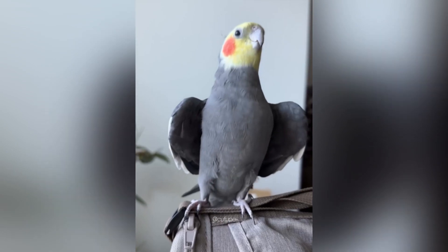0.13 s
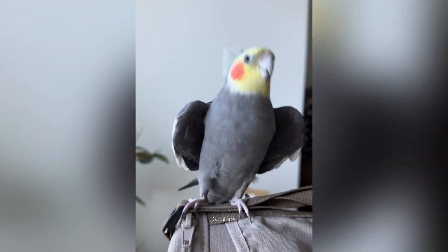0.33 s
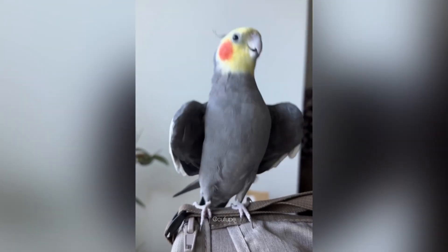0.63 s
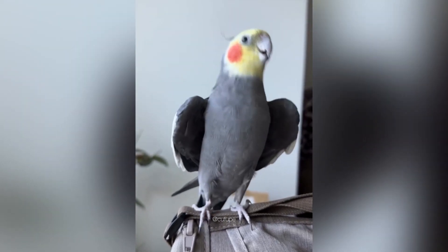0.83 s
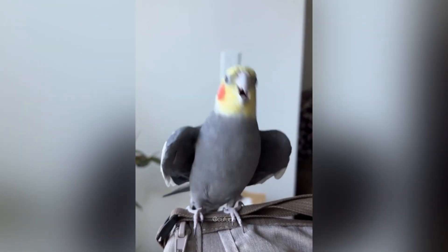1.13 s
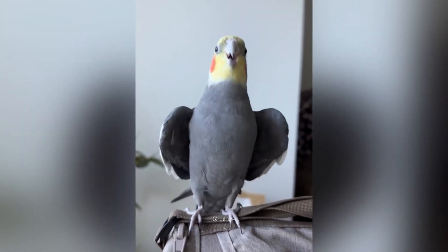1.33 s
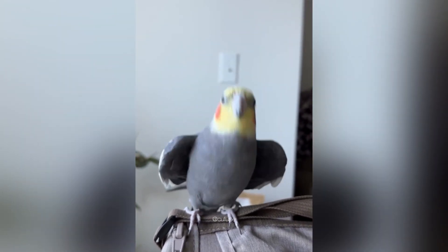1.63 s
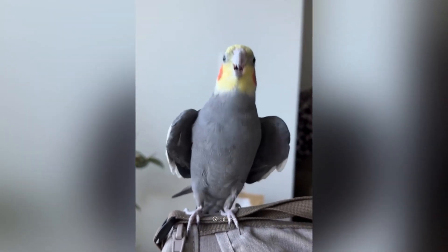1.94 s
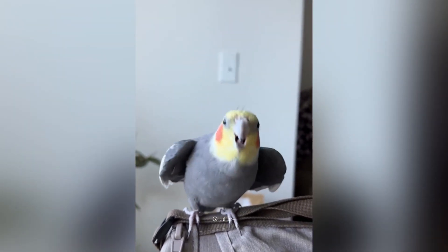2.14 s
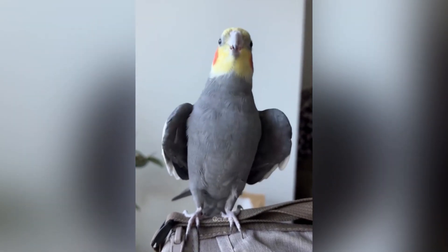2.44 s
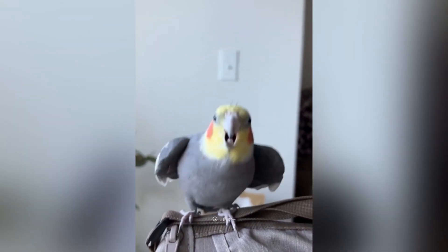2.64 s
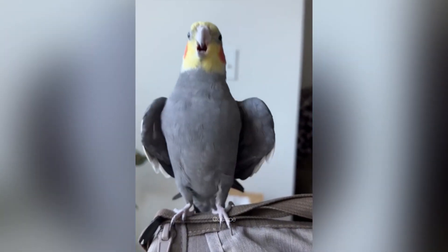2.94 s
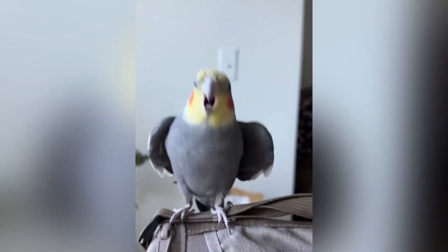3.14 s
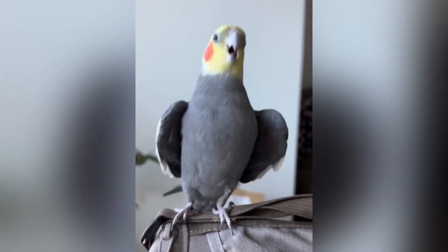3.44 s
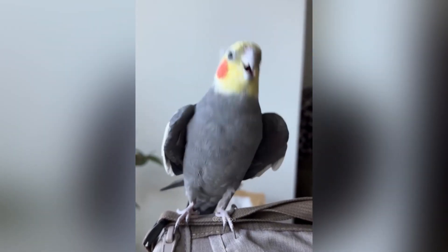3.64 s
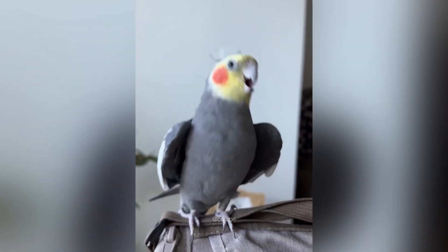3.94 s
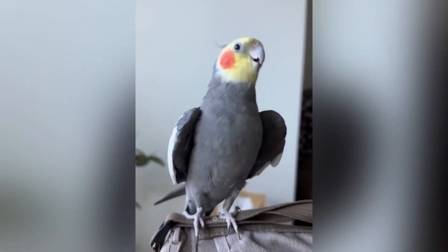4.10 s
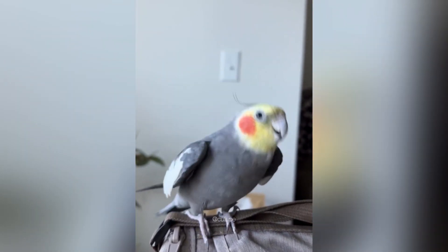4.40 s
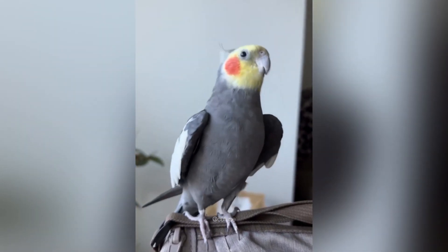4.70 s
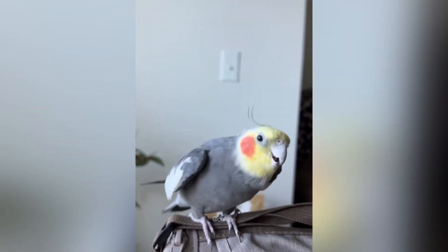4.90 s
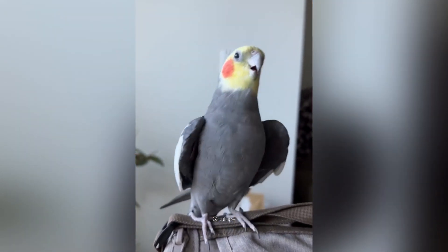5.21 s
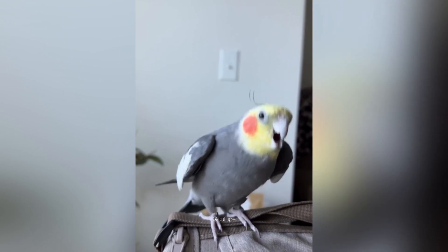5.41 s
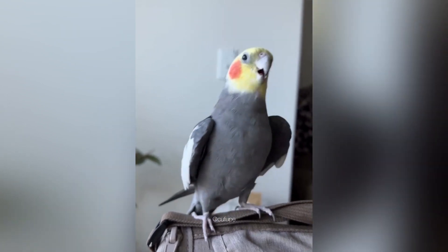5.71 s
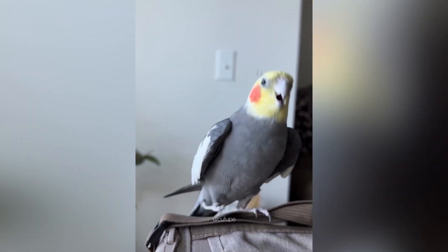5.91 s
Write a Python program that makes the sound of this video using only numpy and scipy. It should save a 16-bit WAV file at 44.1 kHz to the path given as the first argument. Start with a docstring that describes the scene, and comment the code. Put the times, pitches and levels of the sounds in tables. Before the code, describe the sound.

In a small room, a cockatiel shifts with a few faint claw ticks on cloth and a soft feather rustle. It then sings three runs of quick, high whistled chirps with short breaks between them. Each note starts with a creaky rasp, and the notes repeat in groups of three, the last one longer. The bird is close to the microphone, with slight room echo and a faint household motor hum behind.

```python
"""A pet parrot on a chair back sings three runs of short, creaky whistled notes in a small room.
A vibrating membrane gives each whistle its partials; where it slips, it stalls and clicks into a creak.
Throat and beak filter the sound, and near surfaces and the room reflect it.
Claws tick on the cloth and feathers rustle as the bird shifts before it starts.
Behind it a household motor hums and buzzes faintly over soft room noise."""
import sys
import numpy as np
from scipy import signal
from scipy.fft import rfft, irfft
from scipy.io import wavfile
from scipy.ndimage import uniform_filter1d

SR = 44100
rng = np.random.default_rng(int(sys.argv[2]) if len(sys.argv) > 2 else 0)


def dump(signal):
    """Clip the signal to [-1, 1] and save it as 16-bit WAV at the path in sys.argv[1]."""
    limited = np.clip(np.atleast_2d(signal).T, -1, 1)
    pcm = np.round(limited * 32767).astype(np.int16)
    wavfile.write(sys.argv[1], SR, pcm)


N = 267025

# Stereo balance. Each row: frequency in Hz, left minus right level in dB.
BALANCE = [(300, 0), (640, -2.5), (1410, -.5), (3100, 2.5), (6800, .5)]
def parrot():
    """Superposition: the direct song adds to early reflections and to the room's reverberation."""
    song, near = np.zeros((2, N))
    for voice in score():
        start, sound = note(*voice)
        add(song, start, sound)
        for delay, sign in rng.random((8, 2)):  # the head moves: new echoes, within 6 ms, for each note
            add(near, start + delay * .006, np.sign(sign - .5) * sound)
    add(song, *squeak())
    song, near = highpass([song, near], 380)
    balance_db = read(BALANCE, np.fft.rfftfreq(N, 1 / SR))
    direct = np.array([irfft(rfft(song) * amp(side * balance_db), N) for side in (.5, -.5)])
    sideways = near * [[1], [-1]]  # echoes from the side are opposite in the two channels
    return direct + amp(-20.5) * sideways + amp(-12) * room(song)


SLIPS_PER_S = 350
# Subharmonic spectrum. Each row: frequency in Hz, gain in dB.
SUBHARMONIC_GAIN = [(700, -10), (2100, -4), (3500, 3)]
def note(points, beak_hz, least_rasp):
    """Self-sustained oscillation: a membrane whistles; each slip stalls it and jolts its phase."""
    times, *columns = np.transpose(points)
    t = np.arange(times[0], times[-1], 1 / SR)
    age = t - times[0]
    hz, octave_db, fundamental_db, sub_db, creak_db, treble_db = (np.interp(t, times, c) for c in columns)
    rough = 1 / (1 + amp(1.42 * (np.maximum(octave_db, fundamental_db) - creak_db - 2)))  # creak share
    slip_count = np.cumsum(SLIPS_PER_S * amp(2 * drift(len(t), 90))) / SR
    slip = np.diff(np.floor(slip_count), prepend=0) > 0
    jolt, force, breath = rng.standard_normal((len(t), 3)).T
    turns = np.cumsum(hz * (1 + .0034 * drift(len(t), 150))) / SR
    turns += uniform_filter1d(np.cumsum(.22 * rough * slip * jolt), 24)
    swing = 1 - np.clip(1.22 * rough, 0, 1) * (1 - slip_count % 1) ** 2  # regrows after each slip
    swing = uniform_filter1d(swing, 16)
    shimmer = amp(.27 * drift(len(t), 260))
    low = amp(fundamental_db) * np.cos(2 * np.pi * turns)
    low += amp(octave_db) * shimmer * np.cos(4 * np.pi * turns + .71)
    for k in (1, 3, 5):
        low += amp(sub_db + read(SUBHARMONIC_GAIN, k * hz / 2)) * np.cos(np.pi * k * turns)
    alternation = amp(np.minimum(sub_db - fundamental_db - 4, 0))  # strong and weak cycles take turns
    beak = np.interp(age, [.02, .06], beak_hz)
    high = upper_partials(hz, turns, beak, alternation)
    dull, sharp = creak(age, slip_count, slip * amp(1.5 * force), breath, beak)
    rasp = np.clip(least_rasp + .68 * rough ** 1.77, 0, 1)
    treble = np.sqrt(2 * (1 - rasp)) * high * swing + np.sqrt(rasp) * sharp
    leak = evened(resonate(rng.standard_normal(len(t)), 8400, 3100))  # air hisses past the membrane
    hiss = amp(.65 * creak_db + .41 * treble_db - 16.5) * highpass(leak, 7200)
    release_s = .0023 + .023 * rough[-1] ** 2
    ramp = np.clip(np.minimum(age / .0025, (times[-1] - t) / release_s), 0, 1)
    sound = np.sqrt(2) * low * swing + amp(creak_db) * dull + amp(treble_db) * treble + hiss
    return times[0], np.sin(np.pi / 2 * ramp) ** 2 * sound


# Spectrum of the partials above the octave. Each row: frequency in Hz, gain in dB.
TREBLE_GAIN = [(3300, 10.5), (4200, -2.5), (5600, -1), (6300, -7.5), (7000, -14), (8400, -18), (10000, -24),
               (13000, -27.5), (14300, -42.5), (15500, -25.5)]
def upper_partials(hz, turns, beak_hz, alternation):
    """Source and filter: a spectral envelope and a beak resonance weight the multiples of half the pitch."""
    orders, sizes = range(6, 24), []
    for k in orders:
        formant = 1 + 2.67 / (1 + ((k * hz / 2 - beak_hz) / 400) ** 2)
        flicker_db = 3.9 * drift(len(hz), 400) * k / 12
        size = amp(read(TREBLE_GAIN, k * hz / 2) + flicker_db) * formant
        sizes.append(size * alternation if k % 2 else size)
    partials = sum(size * np.cos(np.pi * k * turns + .304 * k * k) for k, size in zip(orders, sizes))
    return partials / np.linalg.norm(sizes, axis=0)


SHUT_S, SPLIT_HZ = (.13, .27), 3700  # the beak shuts over this span after onset; dull/sharp crossover
# Creak spectra with the beak open and shut. Each row: frequency in Hz, gain in dB.
OPEN_CREAK = [(250, -30.5), (500, -11), (700, -5), (1100, -8), (1500, -3.5), (1900, -9), (2800, 12.5),
              (3500, -20), (4300, -6.5), (6000, -9.5), (7200, -31.5), (9000, -25), (13000, -65),
              (15500, -45)]
SHUT_CREAK = [(250, -33), (500, -4), (800, -1.5), (1100, -5), (1500, -9), (2100, 0), (2800, -4.5),
              (3500, -6.5), (4300, -2.5), (6000, -23), (7200, -21), (9000, -22), (13000, -29.5),
              (15500, -38)]
def creak(age, slip_count, clicks, breath, beak_hz):
    """Impulse excitation: slip clicks and breath ring the tract, giving a dull and a sharp band."""
    breathiness = np.interp(age, [.04, .12], [.4, 1.2])
    drive = evened(clicks) + breathiness * breath * (.1 + 2 * (slip_count % 1) ** 2)
    shut = np.interp(age, SHUT_S, [0, 1])
    early, late = (signal.oaconvolve(drive, causal(c))[:len(age)] for c in (OPEN_CREAK, SHUT_CREAK))
    sound = (1 - shut) * early + shut * late
    sound *= 1 + .35 / breathiness * np.cos(2 * np.pi * slip_count - .5)  # bursts around each slip
    dull = signal.sosfiltfilt(signal.butter(4, SPLIT_HZ, fs=SR, output="sos"), sound)
    sharp = sound - dull
    return evened(dull), evened(sharp + 2.6 * resonate(sharp, beak_hz, 320))


# Notes pass four stages: 0 onset, 1 crest of the creak, 2 clear whistle, 3 end of the whistle.
# Each row: onset in seconds; crest, clear and end in seconds after it; pitch at those three in Hz;
# octave level and its offset at the crest in dB; fundamental, subharmonic, creak and treble levels in dB;
# final swell in dB; creak, subharmonic and treble offsets when clear in dB; open beak resonance in Hz.
MIDDLE_NOTES = [ (0.861, 0.025, 0.054, 0.087, 1501, 1379, 1276, -27, 6.5, -40, -45, -40.5, -29.5, -4.5, -2, 1.5, -0.22, 5400),
                (1.128, 0.027, 0.055, 0.091, 1500, 1369, 1334, -27.5, -8, -41, -46, -40, -30.5, -4, 1.5, 2, 1, 4450),
                (1.687, 0.021, .054, 0.083, 1461, 1358, 1284, -28, -6.5, -42, -46, -40, -32, -2, 4.5, 1.5, 0.3, 4430),
                (2.267, 0.016, 0.055, 0.09, 1439, 1331, 1280, -29, -11, -42.5, -44.5, -38.5, -31.5, -4, -2, -2, -1.9, 4200),
                (3.073, 0.017, 0.039, 0.089, 1476, 1361, 1348, -23.5, 0, -39.5, -43, -44, -31, -0.5, -3, -7, 2.6, 5270),
                (3.353, 0.026, .052, 0.082, 1488, 1357, 1270, -29, -1, -42, -45.5, -43.5, -30, -2.5, 5, -3, -0.27, 4300),
                (3.935, 0.0268, 0.0537, .08, 1408, 1325, 1240, -28, 0.5, -42.5, -50, -42, -33.5, -4.5, -3, -2.5, -0.74, 4200),
                (4.776, 0.022, 0.062, 0.1, 1496, 1382, 1334, -25, 2, -38.5, -54, -44.5, -31.5, -3.5, 4.5, 2.5, 1.3, 5660),
                (5.057, .016, 0.049, 0.096, 1500, 1366, 1316, -28, -2, -42.5, -45.5, -44.5, -31.5, -5, 7, -2.5, 1, 4370),
                (5.606, 0.022, .046, 0.085, 1441, 1300, 1279, -29, -2, -44.5, -49.5, -39, -39, -1.5, -7, -15, 1, 4440)]
SHORT_NOTES = [ (1.002, 0.017, 0.05, 0.062, 1553, 1353, 1340, -25, -8, -39.5, -51, -37, -35.5, -2, -1.5, 6, 0.5, 4200),
               (1.28, 0.019, 0.045, .062, 1490, 1314, 1330, -27, -14, -42, -45, -40, -38.5, 1, 1, 0.5, -3.5, 4150),
               (1.836, 0.027, 0.047, 0.068, 1461, 1330, 1260, -28.5, -3, -42, -49.5, -40.5, -41.5, 1, -0.5, 3, 1.5, 4570),
               (2.422, 0.02, .044, 0.059, 1498, 1310, 1310, -27.5, -9.5, -42, -47, -40, -37.5, 5, -4, -2.5, -0.5, 4420),
               (3.219, 0.025, 0.052, .066, 1484, 1386, 1370, -23.5, -15, -39, -45, -38, -39, 2, 0, -1, 2, 5500),
               (3.503, 0.026, 0.047, 0.061, 1459, 1300, 1320, -28, -3.5, -42, -44.5, -39.5, -39, -2, -9, -8, -1.5, 4360),
               (4.082, 0.018, 0.044, .06, 1468, 1315, 1287, -28, -5.5, -43, -50.5, -40.5, -41, -9, -5, -2, 0.5, 4320),
               (4.932, 0.024, 0.04, 0.06, 1483, 1360, 1369, -27, -9, -42, -50, -40.5, -41.5, 7, 0.5, -8, 4.5, 5300),
               (5.217, 0.025, .042, 0.06, 1465, 1287, 1290, -27.5, -8, -44, -48, -39.5, -41, -1, -4, -1, -2, 3930),
               (5.761, 0.017, .046, 0.062, 1480, 1355, 1270, -27.5, -3, -43, -48.5, -41, -40.5, -3, 0, -4, -1, 4150)]
LONG_NOTES = [ (1.411, .022, 0.058, .11, 1528, 1397, 1406, -25.5, -4.5, -35, -44.5, -35.5, -30.5, 0.27, 1.5, 1.5, 1, 5500),
              (1.974, 0.024, 0.056, 0.12, 1513, 1394, 1394, -25, -4, -35, -45, -36, -31.5, 0.39, 1.5, 2, -0.5, 5490),
              (2.556, 0.025, 0.063, 0.12, 1483, 1411, 1389, -23.5, -1, -34, -40.5, -37, -29.5, 0, 0, 0.5, -1.5, 5510),
              (3.642, 0.022, 0.053, 0.12, 1506, 1411, 1395, -24.5, -1, -35.5, -48.5, -38.5, -31.5, 0.12, 2.5, 3.5, 1, 5370),
              (4.227, 0.0239, .052, .11, 1545, 1414, 1383, -27, 1, -36, -46, -38, -33, -0.37, -3, 0, 1.5, 5470),
              (5.353, 0.029, 0.055, 0.17, 1490, 1395, 1336, -25.5, 3, -36.5, -42.5, -39, -33.5, -1.7, -2.5, -6, -3.5, 5500),
              (5.906, 0.029, 0.056, .15, 1482, 1405, 1366, -24.5, -1.5, -37, -52.5, -36.5, -34, -2, 2, 9.5, -1.5, 5700)]
# Contour of each kind of note. Each row: stage, pitch bend in Hz, then offsets of octave,
# fundamental, subharmonics, creak and treble in dB.
MIDDLE_CONTOUR = [(0, -0.5, -8.5, -0.5, -7, -5.5, -2), (1, 1, -10.5, 2.5, 2, -1, 0),
                  (1.5, -6.5, -4, 0, -2, -5.5, -7), (2, 3.5, 0, 1.5, 5, -12, -9.5),
                  (2.45, 28, 0.5, -1, -1, -8, -10), (2.879, 20.5, 1, 3.5, -5, -9.5, -15.5),
                  (3, -45.5, 5.5, 6.5, -11, -10.5, -14.5)]
SHORT_CONTOUR = [(0, 0, -9, 2, -7, -3, -2), (1, -1.5, -9, -2, -3, -1, -6), (1.6, -4, -6, 0, 6.5, 0.5, -7),
                 (2, 0.009, 0, 0, -6, -8.5, -6.5), (2.6, 1.5, -3, -3, -18.5, -13.5, -5.5),
                 (3, -30, -11.5, -3.5, -18, -15.5, -4)]
LONG_CONTOUR = [(0, -4.5, -10.5, -3, -11.5, -6, -0.5), (1, 0.5, -12, -4.5, 0.5, 1, -0.5),
                (2, 0, -1, -1, -5, -9.5, -7.5), (2.45, -2.5, -0.5, -1, -16, -19, -6),
                (2.8, -3, -0.5, -2.5, -13, -14, -12), (3, -1, -3, 0, -5, -10, -12)]
def score():
    """Articulation: each note has a contour, a gliding beak resonance and a least share of treble rasp."""
    kinds = [(MIDDLE_NOTES, MIDDLE_CONTOUR, 1441.6, 4300, .072),
             (SHORT_NOTES, SHORT_CONTOUR, 1465, 3430, .21),
             (LONG_NOTES, LONG_CONTOUR, 1476, 4960, .013)]
    notes = [[stages(row, contour, onset_hz), (row[-1], closed_beak_hz), least_rasp]
             for rows, contour, onset_hz, closed_beak_hz, least_rasp in kinds for row in rows]
    for long_note, ending in zip(notes[-len(LONG_NOTES):], tails()):
        long_note[0] = np.vstack([long_note[0], ending])
    return notes


def stages(row, contour, onset_hz):
    """Frequency and amplitude modulation: a row and its contour give points of time, pitch and levels."""
    onset, crest, clear, end, crest_hz, clear_hz, end_hz, octave_db, choke_db, *others_db = row[:-5]
    swell_db, clear_creak_db, clear_sub_db, clear_treble_db = row[-5:-1]
    stage, bend_hz, *levels_db = np.transpose(contour)
    times = onset + np.interp(stage, range(4), [0, crest, clear, end])
    hz = np.interp(stage, range(4), [onset_hz, crest_hz, clear_hz, end_hz]) + bend_hz
    levels_db = levels_db + np.array([octave_db, *others_db])[:, None]
    levels_db[0] += choke_db * np.clip(1 - 2 * abs(stage - 1), 0, 1)
    levels_db[:2] += swell_db * np.clip(2 * stage - 5, 0, 1)
    levels_db[2:] += np.outer([clear_sub_db, clear_creak_db, clear_treble_db], np.clip(stage - 1, 0, 1))
    return np.column_stack([times, hz, *levels_db])


# Endings of the first five long notes. Each row: break, hollow and end times in seconds, then offsets
# in dB for all levels, for the creak, and for octave and treble when hollow.
NOTE_TAILS = [(1.544, 1.594, 1.625, 1.5, 0, -55, -74), (2.115, 2.157, 2.2, 0.5, 0, -58, -72.5),
              (2.699, 2.747, 2.792, 0.5, 0.0033, -50, -62), (3.789, 3.831, 3.87, 0, 0.0038, -57, -83.5),
              (4.38, 4.495, 4.601, -3, 0.003, -49, -41.5)]
# Break, hollow and end. Each row: pitch in Hz, then base levels of octave, fundamental,
# subharmonics, creak and treble in dB.
TAIL_CONTOUR = [(1460, -31, -41.5, -50.5, -38.5, -54.5), (1393, 1.5, -36, -69, -43.5, -5.5),
                (1452, -58, -41.5, -49.5, -40, -59)]
def tails():
    """Change of vibration regime: a long note breaks into a creak and trails off on its fundamental."""
    for *times, level_db, creak_db, octave_db, treble_db in NOTE_TAILS:
        points = np.array(TAIL_CONTOUR)
        points[:, 1:] += level_db
        points[:, 4] += creak_db
        points[1, [1, 5]] += octave_db, treble_db
        yield np.column_stack([times, points])


# Airy end of the longest note. Each row: time in seconds, frequency in Hz, level in dB.
SQUEAK_GLIDE = [(4.545, 2200, -49.5), (4.58, 2120, -49), (4.62, 1800, -57.5)]
def squeak():
    """Narrow-band noise: a falling resonance gives breath a pitch."""
    times, hz, db = np.transpose(SQUEAK_GLIDE)
    t = np.arange(times[0], times[-1], 1 / SR)
    glide = np.interp(t, times, hz)
    breath = resonate(resonate(rng.standard_normal(len(t)), glide, 400), glide, 900)
    return times[0], amp(np.interp(t, times, db)) * evened(breath)


# Reverberation time. Each row: frequency in Hz, time to fall 60 dB in seconds.
DECAY_TIMES = [(500, 0.25), (1400, 0.51), (2800, 0.41), (6000, 0.46), (12000, 0.62)]
def room(sound):
    """Reverberation: reflections of random sign decay exponentially, each band at its own rate."""
    taps = np.zeros((2, SR))
    arrivals = np.arange(200, SR - 20, 20) + rng.integers(0, 20, (2, (SR - 201) // 20))
    np.put_along_axis(taps, arrivals, rng.choice([-1., 1.], arrivals.shape), 1)
    taps[1] = .5 * taps[0] + .98 * taps[1]
    hz, t, spectra = signal.stft(taps, SR, nperseg=256)
    response = signal.istft(spectra * amp(-60 * t / read(DECAY_TIMES, hz)[:, None]), SR, nperseg=256)[1]
    return signal.fftconvolve(sound[None], response / np.linalg.norm(response[0]), axes=1)[:, :N]


# Claws on cloth. Each row: start in seconds, level in dB, ring frequency in Hz.
CLAW_TICKS = [(0.336, -61, 1800), (0.356, -61, 1700), (0.406, -50, 1520), (0.491, -59, 2630),
              (0.5594, -60, 1640), (0.5866, -63, 8000), (0.6724, -59, 7690), (4.688, -55, 2300)]
def claws():
    """Damped vibration: each impact leaves a noisy ring that falls 60 dB in 7.6 ms."""
    ticks, t = np.zeros(N), np.arange(SR // 8) / SR
    for start, db, hz in CLAW_TICKS:
        ring = np.sin(2 * np.pi * hz * t) + .39 * rng.standard_normal(len(t))
        add(ticks, start, amp(db - 60 * t / .0076) * ring)
    return ticks


# Feathers and cloth. Each row: time in seconds, level in dB.
RUSTLE_LEVELS = [(.35, -94), (.46, -87), (.5, -76), (.6, -71), (.63, -88), (.8, -89)]
# Soft hisses after two long notes. Each row: start in seconds, level in dB.
SOFT_HISSES = [(2.208, -61), (2.815, -62)]
def rustle():
    """Amplitude-modulated noise: a flickering rustle of feathers and cloth, and two smooth hisses."""
    hiss = highpass(rng.standard_normal(N), 4000, order=2)
    level_db = np.interp(np.arange(N) / SR, *np.transpose(RUSTLE_LEVELS), left=-130, right=-130)
    sound = amp(level_db + 2.2 * drift(N, 90)) * hiss
    for start, db in SOFT_HISSES:
        add(sound, start, amp(db) * hiss[round(start * SR):][:2800] * np.hanning(2800))
    return sound


TURNS_PER_S = 59.2
# Motor hum. Each row: frequency in Hz, level in dB.
HUM_LINES = [(183.0, -66.5), (231.5, -74), (366.1, -77), (414.5, -76.5), (549.1, -80.5)]
# Low rumble. Each row: time in seconds, level in dB.
RUMBLE_LEVELS = [(0, -73.5), (1.2, -72.5), (2.2, -79.5), (3.7, -78.5), (4.6, -81.5), (5.2, -70.5),
                 (6.05, -79)]
def motor():
    """Forced vibration: over hum and rumble, one knock a turn rings the casing and puffs out hiss."""
    t, hum = np.arange(N) / SR, np.zeros(N)
    for hz, db in HUM_LINES:
        peak = np.sqrt(2) * amp(db + 1.9 * drift(N, 1500))
        hum += peak * np.sin(2 * np.pi * hz * t + .5 * drift(N, 2500))
    knocks = np.diff(np.floor(TURNS_PER_S * t), prepend=0)
    casing = resonate(resonate(knocks, 1160, 300), 1160, 300)
    puffs = resonate(rng.standard_normal(N), 5200, 350) * (1 + np.cos(2 * np.pi * TURNS_PER_S * t))
    rumble = evened(resonate(rng.standard_normal(N), 62, 42))
    rumble *= amp(np.interp(t, *np.transpose(RUMBLE_LEVELS)))
    return rumble + hum + amp(-81.5) * evened(casing) + amp(-88) * evened(puffs)


# Room noise. Each row: frequency in Hz, relative spectral density in dB.
AIR_SPECTRUM = [(20, -16), (70, -17.5), (130, -5), (240, -1.5), (450, -6), (700, -11.5), (1200, -15),
                (2200, -23.5), (3500, -35), (7000, -34), (15500, -39.5)]
# Likeness of left and right. Each row: frequency in Hz, correlation from 0 to 1.
AIR_CORRELATION = [(180, 1), (550, 0.27), (1650, 0.14), (5000, 0.53)]
def air():
    """Partly coherent noise: random spectra, partly shared by both sides, swell in faint patches."""
    frames, hz = N // 512 + 5, np.fft.rfftfreq(2048, 1 / SR)
    a, b, c, d, patches = rng.standard_normal((frames, len(hz), 5)).T
    patches = evened(uniform_filter1d(uniform_filter1d(patches, 20, 0), 8, 1))
    shared = read(AIR_CORRELATION, hz)[:, None]
    left = a + 1j * b
    right = shared * left + np.sqrt(1 - shared ** 2) * (c + 1j * d)
    spectra = np.array([left, right]) * amp(read(AIR_SPECTRUM, hz)[:, None] + 3.9 * patches)
    return amp(-68.5) * evened(signal.istft(spectra, nperseg=2048, noverlap=1536)[1][:, :N])


def amp(db):
    """Decibels to amplitude."""
    return 10 ** (np.asarray(db) / 20)


def evened(x):
    """Normalisation to rms 1."""
    return x / np.sqrt(np.mean(x ** 2) + 1e-20)


def read(points, hz):
    """Interpolation over log frequency."""
    f, value = np.transpose(points)
    return np.interp(np.log(hz + 1), np.log(f + 1), value)


def add(mix, start_s, sound):
    """Superposition, in place."""
    part = mix[round(start_s * SR):][:len(sound)]
    part += sound[:len(part)]


def drift(length, span):
    """Random fluctuation of rms 1, smoothed twice over span samples."""
    return evened(uniform_filter1d(uniform_filter1d(rng.standard_normal(length), span), span))


def highpass(x, hz, order=4):
    """Attenuation below hz."""
    return signal.sosfilt(signal.butter(order, hz, "high", fs=SR, output="sos"), x)


def resonate(x, hz, width_hz):
    """Resonance of gain 1 by heterodyning: shift hz down to zero, smooth, shift back."""
    carrier = np.exp(2j * np.pi * np.cumsum(hz * np.ones(len(x))) / SR)
    pole = np.exp(-np.pi * width_hz / SR)
    return 2 * (carrier * signal.lfilter([1 - pole], [1, -pole], x / carrier + 1e-18)).real


def causal(spectrum, size=2048):
    """Minimum phase: the shortest causal response with this spectrum."""
    log_gain = np.log(amp(read(spectrum, abs(np.fft.fftfreq(size, 1 / SR)))))
    return np.fft.ifft(np.exp(np.conj(signal.hilbert(log_gain)))).real[:size // 2]


def scene():
    """Linear superposition: the pressures of all sources add."""
    return parrot() + air() + motor() + claws() + rustle()


START_S, CUTOFF_HZ = .036, 15800
def record(dry):
    """Gating and band limiting: a moment of silence, then everything below the cutoff."""
    opened = dry * (np.arange(N) / SR > START_S)
    lowpass = signal.firwin(2047, CUTOFF_HZ, window=("kaiser", 9), fs=SR)
    return signal.oaconvolve(opened, lowpass[None], "same")


dry = scene()
out = record(dry)
dump(out)
```